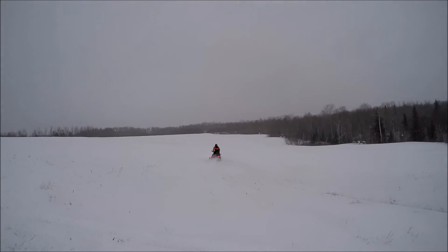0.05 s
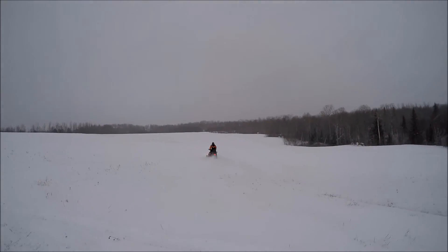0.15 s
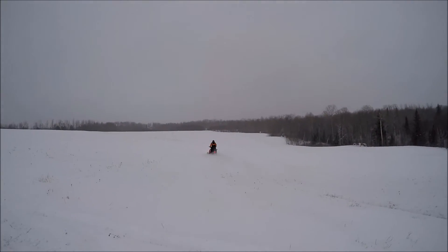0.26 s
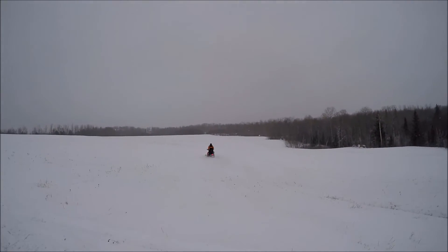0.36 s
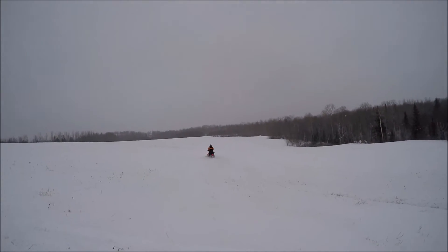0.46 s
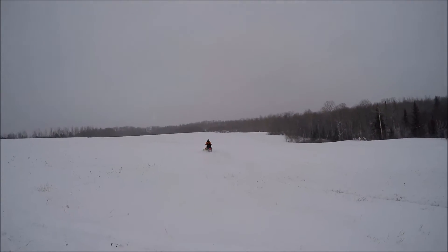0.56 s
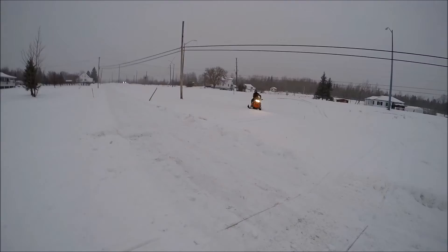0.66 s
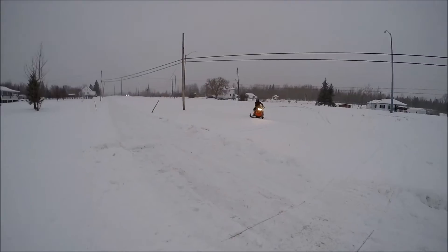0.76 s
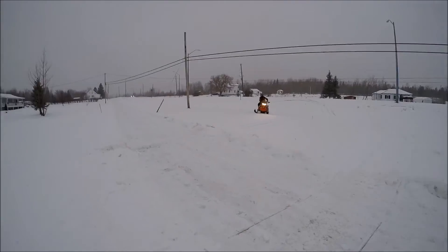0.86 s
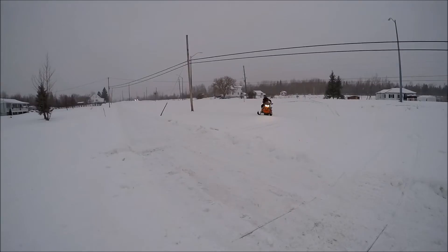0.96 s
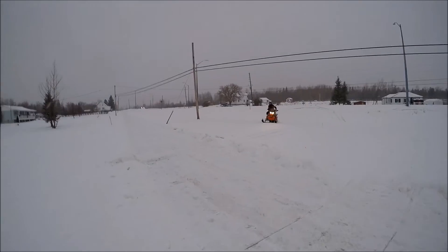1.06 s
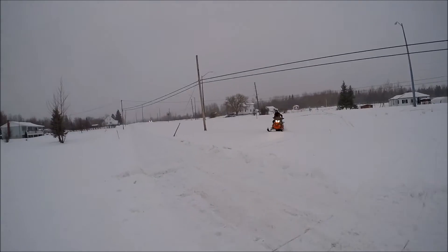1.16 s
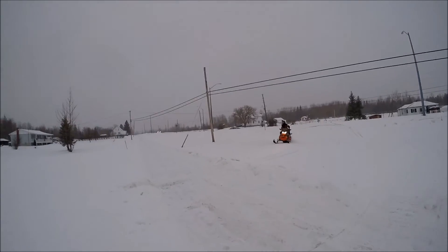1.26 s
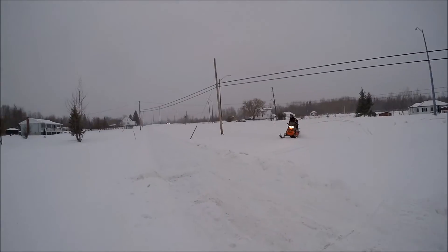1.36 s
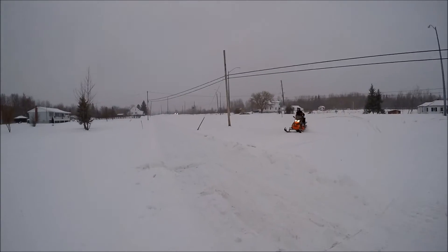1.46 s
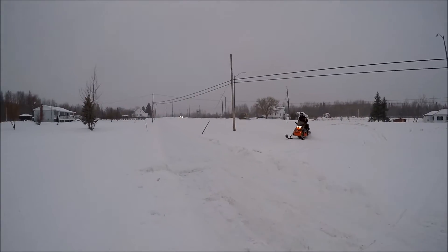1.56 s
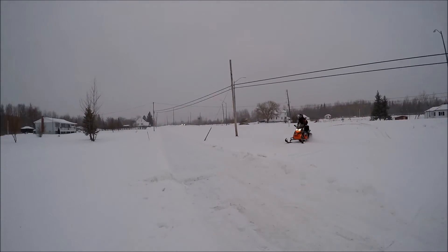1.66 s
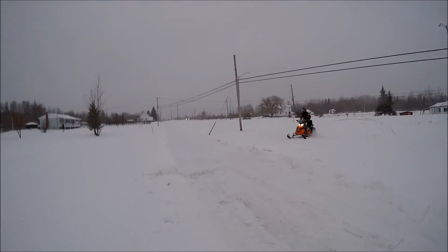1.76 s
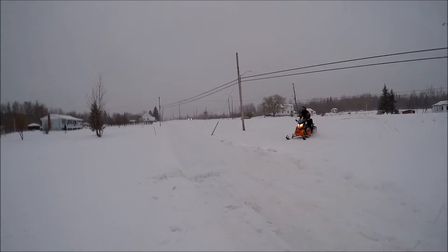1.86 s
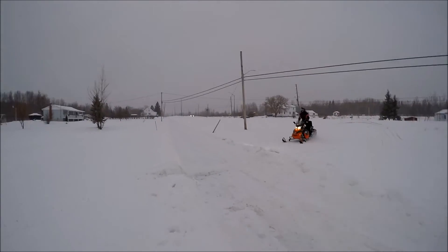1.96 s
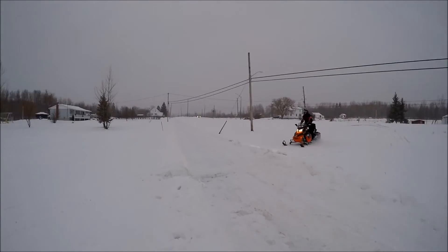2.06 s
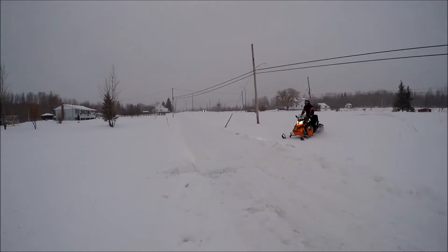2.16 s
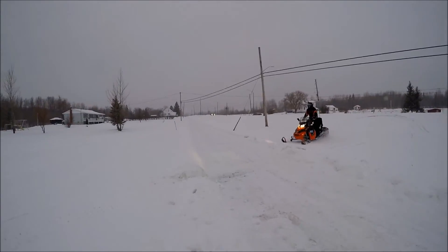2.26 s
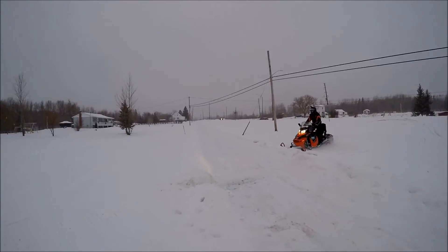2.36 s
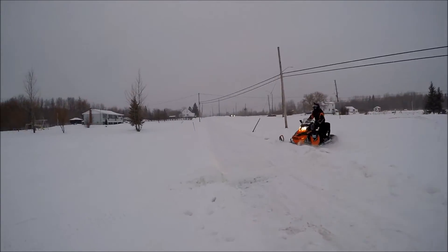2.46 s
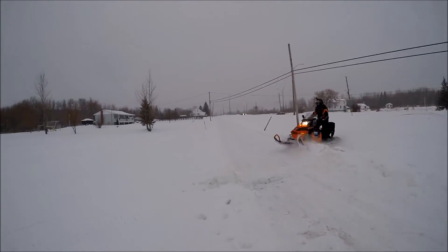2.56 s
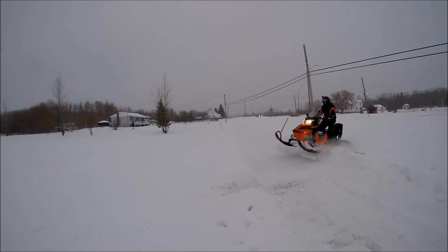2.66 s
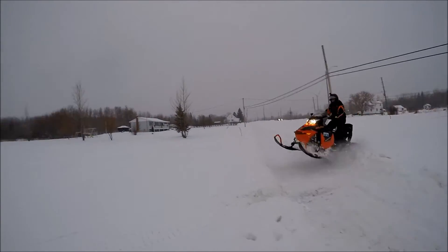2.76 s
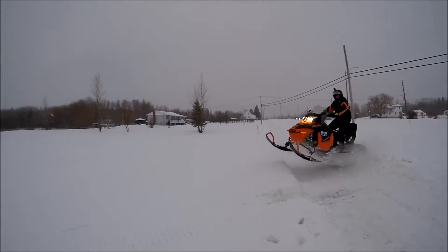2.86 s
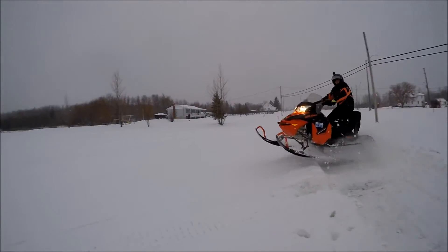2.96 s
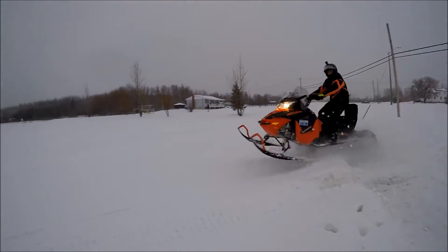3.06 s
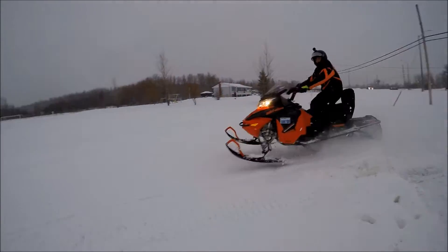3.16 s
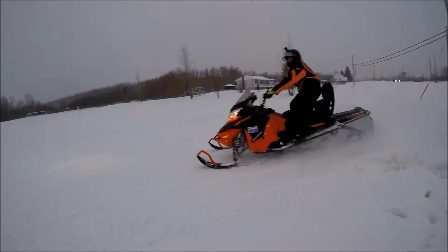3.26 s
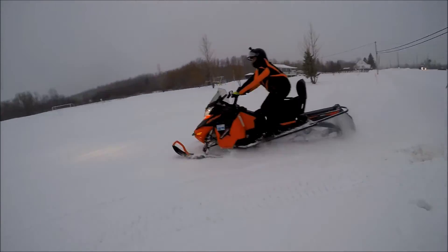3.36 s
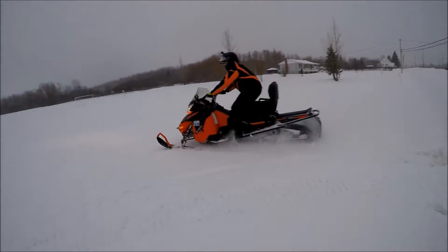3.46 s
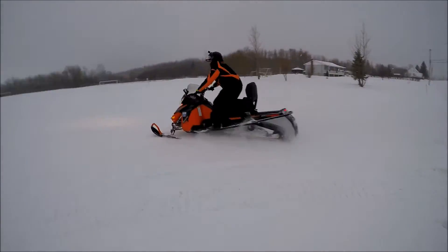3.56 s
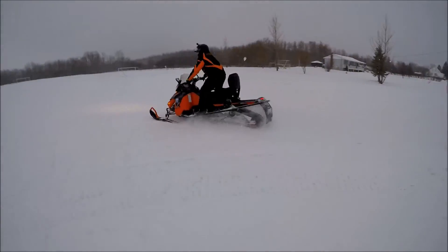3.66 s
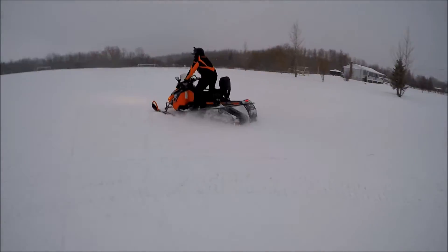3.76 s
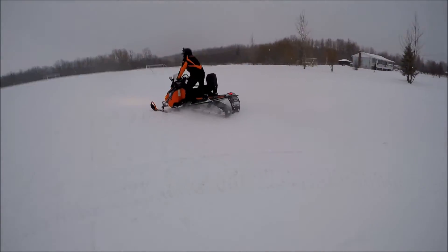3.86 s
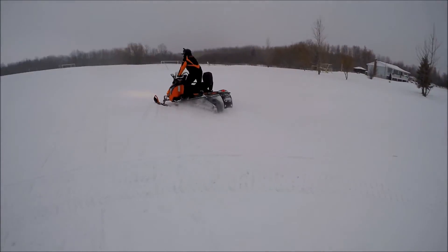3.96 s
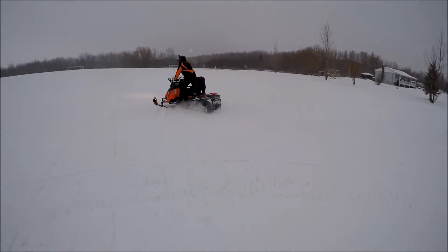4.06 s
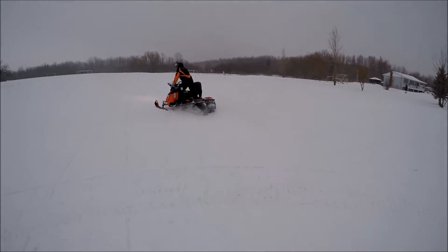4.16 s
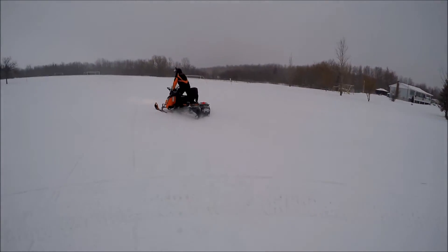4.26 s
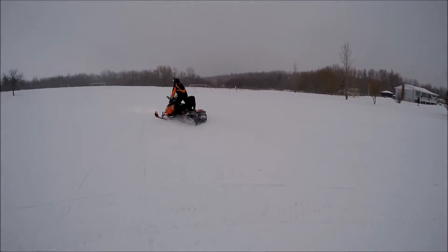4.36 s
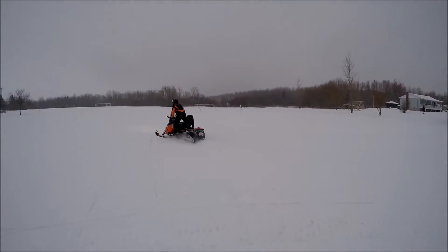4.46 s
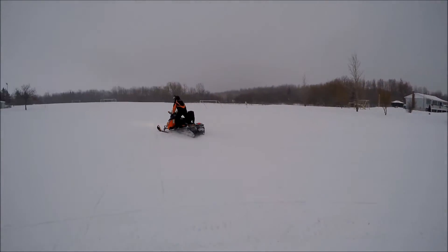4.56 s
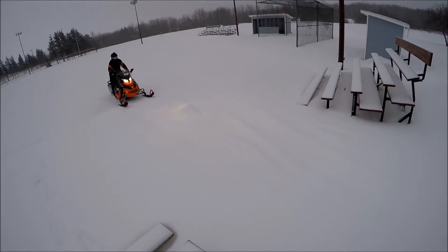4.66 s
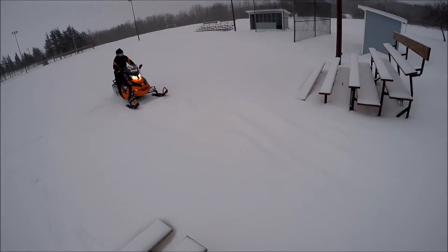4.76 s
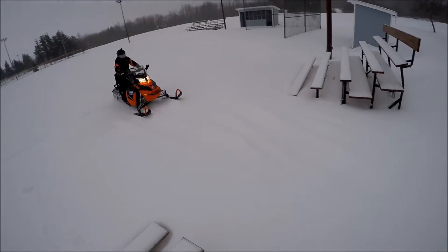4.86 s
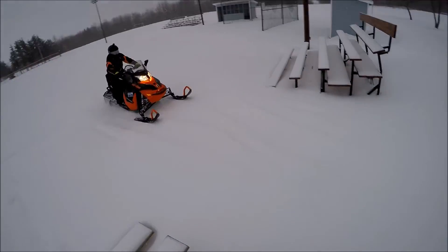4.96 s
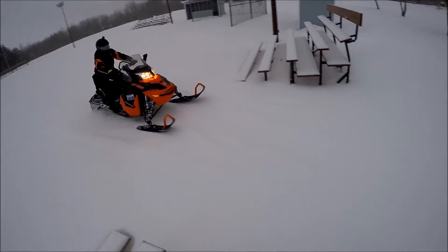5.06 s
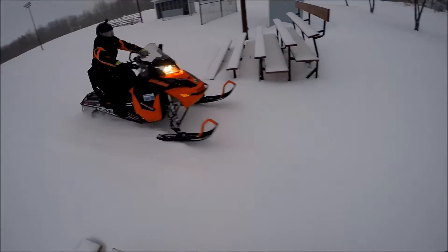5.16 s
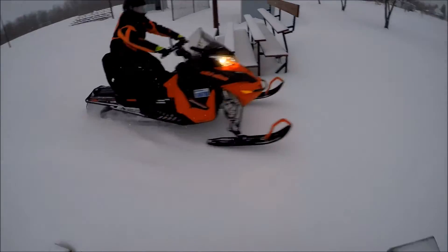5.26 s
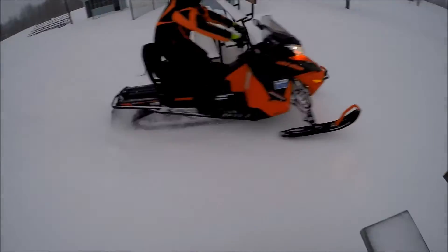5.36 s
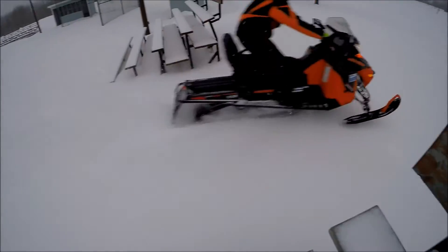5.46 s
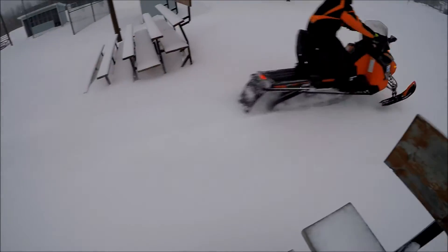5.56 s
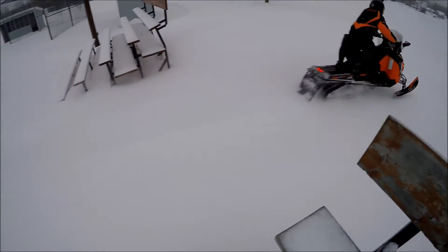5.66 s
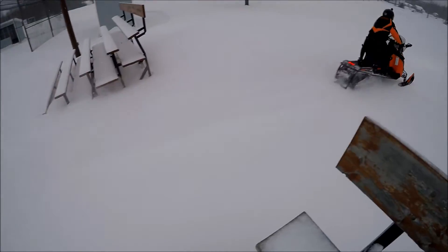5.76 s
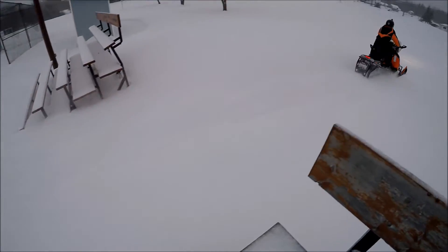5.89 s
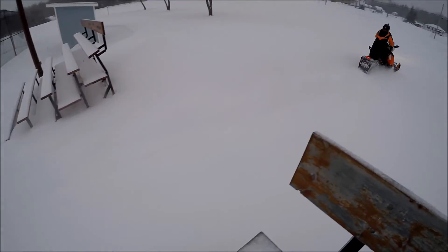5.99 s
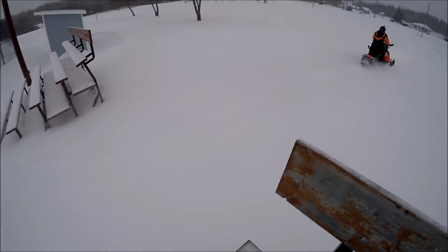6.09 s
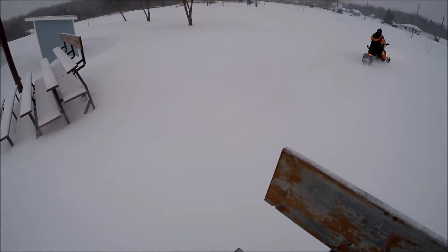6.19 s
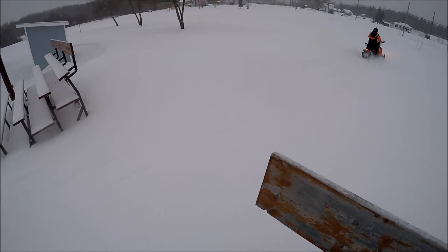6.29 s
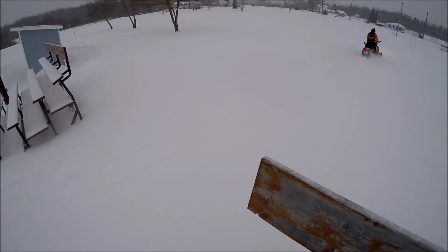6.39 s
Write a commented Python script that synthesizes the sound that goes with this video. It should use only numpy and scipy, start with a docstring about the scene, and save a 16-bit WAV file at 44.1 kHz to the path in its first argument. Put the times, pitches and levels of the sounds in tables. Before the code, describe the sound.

A snowmobile drones faintly across an open snowy field while a glove rubs and clicks on the hand-held microphone. After a brief silence it approaches, revs up over a jump, then eases off with a rattling chassis, humming track and hissing snow. More handling clicks lead to another tiny gap, then the machine buzzes past very close and moves away. Low wind buffets the microphone throughout.

```python
"""A snowmobile drones far off across the snow, then takes a jump, then passes close to the microphone:
three positions, with a brief silence between them. The exhaust drones at the firing rate, the engine
buzzes and clatters, and the track hums at its own lug rate, rattles the chassis and throws snow.
Wind buffets the microphone; a glove rubs and clicks on its housing, mostly just before each silence."""
import sys
import numpy as np
from scipy import signal
from scipy.fft import rfft, irfft
from scipy.io import wavfile
from scipy.ndimage import uniform_filter1d

SR = 44100
rng = np.random.default_rng(int(sys.argv[2]) if len(sys.argv) > 2 else 0)


def persist_wave(psi):
    """Save psi, clipped to +-1, as 16-bit WAV."""
    counts = np.round(np.clip(psi, -1, 1) * 32767).astype(np.int16)
    wavfile.write(sys.argv[1], SR, np.atleast_2d(counts).T)


N = 283563
T = np.arange(N) / SR
BINS = np.fft.rfftfreq(N, 1 / SR)

# microphone positions (far off, at the jump, close by): start t/s, end t/s
POSITIONS = [(0, .656), (.740, 4.592), (4.626, 6.44)]
# spectra at the microphone: f/Hz, level/dB
HISS = [(100, 22), (300, 3), (600, 4.5), (1000, 5.5), (3000, -1.5), (7000, -9), (9700, -6), (12000, -12.5),
        (14500, -10.5), (16000, -32.5)]  # still air and microphone hiss
WIND_BUFFET = [(5, -18), (20, 6), (35, -10.5), (60, -8.5), (100, -34.5), (200, -34.5), (500, -96),
               (1500, -100)]
GLOVE_SCRAPE = [(400, -30), (1100, -10), (1900, 4), (2700, 4.5), (3400, -2), (4200, -7), (5300, -15),
                (6600, -10), (8500, -26), (12000, -24), (16000, -44.5)]
# gusts and lulls: t/s, half length/s, level/dB
GUSTS = [(1.05, .22, -4), (2.2, 0.34, 10), (2.87, 0.19, 6), (3.45, 0.3, 6), (4.75, 0.073, -7),
         (5.7, .25, 2)]
# modes of the microphone's housing: f/Hz, level/dB, t60/s
HOUSING_MODES = [(860, -5, 0.0043), (1720, -0.5, 0.014), (2015, -7.5, 0.02), (2390, -3.5, 0.0096),
                 (3830, -5.5, 0.0053), (5060, -14, 0.012)]
# clicks on the housing: t/s, level/dB, relative knock/dB, relative crack/dB, ring pitch/ratio
CLICKS = [(0.4326, -14, -23, -20, 1.55), (0.4424, -23.5, -4, 9.5, 1.2), (0.5484, -15.5, -20, -35, 0.95),
          (.606, 0.5, -26, -7, 0.99), (0.6206, -20.5, -10.5, 10, 1.1), (0.6257, -14, -12.5, 1, .92),
          (0.6455, 1.5, 14, 0, .9), (0.645, -5.5, 1, -18, 0.73), (0.977, -32.5, -16, -1.5, 1.18),
          (1.063, -48, -20, 13, 3.3), (3.756, -29, -15, 5, 0.58), (4.1088, -11, -22, -16, 1.367),
          (4.357, -20.5, -28, -23, 0.92), (4.5393, -3, 1, -9, 0.93), (6.179, -28.5, -10, -3, 1.15)]
# glove strokes: t/s, length/s, level/dB, squeak f/Hz
RUBS = [(0.428, 0.036, -26, 2300), (0.561, 0.031, -32, 1890), (0.586, 0.083, -37.5, 1970),
        (4.13, 0.021, -35, 1940), (4.173, 0.049, -35.5, 1990), (4.214, 0.069, -41, 2130),
        (4.279, 0.033, -33.5, 2400), (4.368, 0.089, -43.5, 1660), (4.391, 0.034, -41, 1860),
        (4.463, 0.057, -43.5, 2310), (4.581, .012, -43, 2060)]
# soft bumps on the microphone: t/s, level/dB, f/Hz, decay/s
BUMPS = [(0.054, -21, 170, 0.0025), (0.437, -8, 46.7, 0.0095), (0.6, -9.5, 25.2, 0.012),
         (0.645, -2, 99, 0.0024), (0.741, -18.5, 27.1, 0.039), (1.443, -18.5, 38, 0.0081),
         (1.743, -27, 217, 0.0031), (4.112, -11, 54, 0.0087), (4.511, -12.5, 32.6, 0.028)]
# engine and track speed, one list a position: t/s, firing f/Hz, lug f/Hz
SPEED = [
    [(0, 209, 75), (.45, 203, 100)],
    [(.74, 153, 72), (1.5, 151, 75), (1.85, 159, 87), (2.3, 209, 120), (2.55, 249, 159), (2.75, 242, 171),
     (2.92, 238, 208), (3.05, 199, 198), (3.17, 172, 161), (3.35, 143, 127), (3.8, 135, 112),
     (4.59, 123, 89)],
    [(4.63, 200, 151), (4.86, 222, 167), (5.03, 245, 193), (5.2, 255, 236), (5.38, 248, 251),
     (5.63, 235, 224), (5.85, 198, 168), (6.15, 184, 142), (6.43, 176, 131)],
]
# the sled's pass at each position: nearest t/s, time to cover the nearest distance/s, base level/dB,
# gain from behind/dB, relative exhaust/dB, relative track hum/dB
PASSES = [(.4, 2.5, -42.5, -3, -12.5, 1.6), (2.98, 0.7, -34, 2, 9.5, 5), (5.44, 0.25, -28.5, -2, 6, 1.34)]
# pulls on the throttle: open t/s, shut t/s, opening/0-1
THROTTLE_PULLS = [(-.2, 0.688, 0.59), (.7, 1.797, 0.76), (1.825, 2.965, 1), (4.483, 5.6, 0.86)]
# the track bites, spins free or slackens: t/s, half length/s, clatter/dB, spray and ring/dB, rattle/dB
SURGES = [(.39, 0.045, 3, 3, 0), (1.6, 0.36, -1, -7, -2), (1.9, 0.047, 1, -2, 0),
          (2.42, 0.14, 1.5, 3.5, -10), (2.84, .08, -2.5, -2, -5), (3.06, 0.085, 4, 5.5, 13),
          (3.2, 0.057, -3, -4, 11), (3.42, 0.14, 1.5, 1.5, 13), (3.72, 0.3, 0.5, 6, -3),
          (4.98, 0.11, 2, 3, -13), (5.33, 0.088, -0.5, 4, 2), (5.5, 0.095, 1.5, 0.5, 0),
          (5.79, 0.071, 2.5, 1.5, 0), (6.06, 0.068, -1.5, -5, -4)]
# modes of the metal chassis: f/Hz, half width/Hz, level/dB
CHASSIS_MODES = [(2710, 70, 10), (3520, 63, -1.5), (4700, 170, 4.5), (5600, 280, -8.5), (6450, 200, -5.5),
                 (8450, 320, -13), (10500, 290, -17.5)]
# spectra of the chassis: f/Hz, level/dB
CHASSIS_RATTLE = [(200, -15), (400, 8.5), (550, -21), (750, -1), (1000, -10), (1400, 11.5), (2500, -65)]
CHASSIS_RUMBLE = [(30, -31), (70, 4), (130, 6), (200, -2), (300, -7.5), (420, -17.5), (600, -25.5),
                  (1000, -57)]
# spectra of thrown snow, engine clatter and engine buzz, across the field and close by: f/Hz, level/dB
SPRAY_FIELD = [(3500, -21), (5200, 2.5), (5800, 0.5), (6600, 2), (7350, -8.5), (8300, -4.5), (9000, -11.5),
               (9700, -9), (11300, -12.5), (13000, -12), (14800, -20.5), (16000, -44)]
SPRAY_CLOSE = [(3500, -47), (5200, -8), (5700, 6), (6300, 6), (7400, -3.5), (8500, -0.5), (9200, -5.5),
               (10700, -5), (11900, -11), (14000, -12), (15200, -24), (16000, -32)]
CLATTER_FIELD = [(560, -43), (950, -13.5), (1200, -1.5), (1400, 2.5), (1580, -1), (1830, 7), (2010, 0.5),
                 (2290, 6), (2560, -2), (2970, -8.5), (3440, -1.5), (3730, -6), (4160, 0.5), (4680, -5),
                 (5500, -32), (7150, -60), (12100, -120)]
CLATTER_CLOSE = [(560, -14), (950, -17.5), (1080, -11.5), (1300, 2.5), (1420, -2), (1800, 6.5),
                 (2070, -6.5), (2290, -0.5), (2490, -8.5), (2680, -10), (2860, -18.5), (3310, -3.5),
                 (3780, -17), (4130, -4), (5500, -20.5), (7150, -67), (12100, -120)]
BUZZ_FIELD = [(290, -35), (390, -1), (490, -5.5), (570, -28), (750, -12), (950, -20), (1200, 2),
              (1480, 6.5), (1800, 4), (2050, -4.5), (2330, 3.5), (2800, -11.5), (4500, -30)]
BUZZ_CLOSE = [(240, -30), (310, 9), (390, -6), (500, 2.5), (590, -34), (800, -16.5), (1000, -7.5),
              (1300, 6.5), (1800, 2.5), (2050, -3.5), (2260, 6), (2480, -8.5), (2660, -1), (2900, -7.5),
              (4500, -11)]
# harmonics of track and exhaust: multiple of the lug or crank rate, level/dB
LUG_ORDERS = [(1, -1.5), (2, -18.5), (3, -34.5), (4, -39)]
EXHAUST_ORDERS = [(1, -9), (2, 0), (3, -33), (4, -31.5)]
# swells and dips of the track's fundamental and of the exhaust: t/s, half length/s, level/dB
HUM_SWELLS = [(2.65, 0.21, 5), (3.17, 0.13, -10), (3.5, 0.22, 10), (4, 0.23, 0.5), (5.05, 0.39, -5),
              (5.5, 0.028, 6), (5.7, 0.067, -8)]
EXHAUST_SWELLS = [(.9, 0.24, 2.5), (1.85, .12, -3), (2.09, 0.12, -11), (2.45, 0.6, -4.5),
                  (2.73, 0.093, 8.5), (3.05, 0.17, -14.5), (3.45, 0.088, 0.5), (4.8, 0.3, 1.5),
                  (5.74, 0.052, 7.5), (6.35, 0.14, -3)]


def amp(db):
    """Decibels to gain."""
    return 10 ** (np.asarray(db) / 20)


def unit(x):
    """Scales to rms 1."""
    return x / np.sqrt(np.mean(x ** 2) + 1e-20)


def noise():
    """White noise."""
    return rng.standard_normal(N)


def wander(hz):
    """Random drift of rms 1, up to about hz."""
    return unit(irfft(rfft(noise()) / (1 + (BINS / hz) ** 4), N))


def colour(x, spectrum):
    """Shapes x with a spectrum, at rms 1."""
    hz, db = np.transpose(spectrum)
    return unit(irfft(rfft(x) * amp(np.interp(np.log(BINS + 1), np.log(hz), db)), N))


def by_place(x, field, close):
    """Colours x for the open field, or for the close pass at the last position."""
    return np.where(T < POSITIONS[2][0], colour(x, field), colour(x, close))


def swells(rows):
    """Smooth rises and dips in dB, one curve for each level column."""
    return np.squeeze(sum(np.outer(dbs, np.exp(-((T - s) / half) ** 2)) for s, half, *dbs in rows))


def harmonics(turns, orders):
    """Sines on multiples of a rotation, at random phases."""
    return sum(amp(db) * np.sqrt(2) * np.sin(2 * np.pi * (k * turns + rng.random())) for k, db in orders)


def add(mix, s, sound):
    """Mixes a sound in at time s."""
    part = mix[max(round(s * SR), 0):][:len(sound)]
    part += sound[:len(part)]


def hiss():
    """Still air and the microphone's own faint noise."""
    return amp(-59) * colour(noise(), HISS)


def wind():
    """Lumpy low buffeting at the microphone."""
    return colour(noise(), WIND_BUFFET) * amp(-30 + swells(GUSTS) + 1.73 * wander(2.4))


def bumps():
    """Soft bumps push on the microphone, each a low damped pulse."""
    out, t = np.zeros(N), T[:SR // 4]
    for s, db, hz, decay in BUMPS:
        envelope = t / decay * np.exp(1 - t / decay)
        add(out, s, -amp(db) * envelope * np.sin(2 * np.pi * hz * t))
    return out


def housing_clicks():
    """Taps right at the microphone ring its housing, with a crack and a hollow knock."""
    out, t = np.zeros(N), T[:SR // 4]
    lowpass = signal.butter(2, 7400, fs=SR)
    for s, db, knock_db, crack_db, pitch in CLICKS:
        ring = np.zeros(len(t))
        for k, (hz, mode_db, t60) in enumerate(HOUSING_MODES):
            mode_hz = hz * pitch * rng.uniform(0.86, 1.04)
            ring += (-1) ** k * amp(mode_db - 60 * t / t60) * np.sin(2 * np.pi * mode_hz * t)
        burst = rng.standard_normal(len(t)) * np.exp(-t / 0.0011)
        crack = amp(crack_db) * signal.lfilter(*lowpass, burst)
        knock = amp(knock_db) * np.sin(2 * np.pi * 430 * t) * np.exp(-t / 0.00051)
        add(out, s, amp(db) * (0.84 * ring + crack + knock))
    return out


def glove_rubs():
    """A glove slips over the housing: a narrow squeak and a broad scrape."""
    squeaks, friction = np.zeros(N), np.zeros(N)
    for s, length, db, hz in RUBS:
        n = round(length * SR)
        slips = unit(rng.standard_normal(n) * amp(0.91 * rng.standard_normal(n)))
        stroke = amp(db) * signal.windows.tukey(n, .4)
        squeak = signal.lfilter(*signal.butter(2, [hz * .88, hz * 1.12], "band", fs=SR), slips)
        add(squeaks, s, stroke * unit(squeak))
        add(friction, s, stroke * slips)
    return amp(3) * squeaks + amp(3.5) * np.std(friction) * colour(friction, GLOVE_SCRAPE)


def speeds():
    """Firing and lug rates in Hz; each position takes over at its own start."""
    curves = np.zeros((2, N))
    for (start, _), rows in zip(POSITIONS, SPEED):
        times, *rates = np.transpose(rows)
        curves[:, T >= start] = [np.interp(T[T >= start], times, hz) for hz in rates]
    return curves


def thumb_throttle(travel_s=0.057):
    """Throttle opening, 0-1: the thumb takes a moment to open or shut it."""
    pulls = sum(opening * ((T >= opens) & (T < shuts)) for opens, shuts, opening in THROTTLE_PULLS)
    return uniform_filter1d(pulls, size=int(travel_s * SR))


def pass_by(lug_hz, throttle, db_per_octave=6.5, load_db=4):
    """Sled, exhaust and hum levels at the microphone: louder when near, fast and under load."""
    position = sum((T >= start).astype(int) for start, _ in POSITIONS[1:])
    nearest_s, cover_s, base_db, rear_db, exhaust_db, hum_db = np.array(PASSES)[position].T
    along = (T - nearest_s) / cover_s
    distance = np.hypot(1, along)  # in multiples of the nearest distance
    behind = along / distance  # -1 approaching, 1 going away
    db = base_db - 20 * np.log10(distance) + rear_db * behind
    db += db_per_octave * np.log2(lug_hz / 200) + load_db * throttle
    return db, db + exhaust_db, db + hum_db, behind


def snow_spray(lugs, db, behind, jolts):
    """The lugs fling snow backwards: a fluttering hiss, a little louder from behind."""
    puffs = noise() * (1 + 0.051 * np.cos(2 * np.pi * lugs)) * amp(2.04 * wander(300))
    return by_place(puffs, SPRAY_FIELD, SPRAY_CLOSE) * amp(db - 18.5 + behind + 1.9 * jolts)


def chassis(rattle_db, ring_db, coast, jolts):
    """The chassis rattles over uneven snow; grit and lugs keep its metal ringing."""
    rattle = colour(noise(), CHASSIS_RATTLE) * amp(rattle_db - 24.5 + 1.2 * jolts)
    modes = sum(amp(db) / (1 + ((BINS - hz) / width) ** 2) for hz, width, db in CHASSIS_MODES)
    ring = unit(irfft(rfft(noise()) * modes, N))
    return rattle + ring * amp(ring_db - 19.5 - 0.5 * coast + 2.5 * jolts)


def track_rumble(db, buzz_db, jolts):
    """Off the throttle, as the buzz fades, the slack track flaps against the chassis."""
    return colour(noise(), CHASSIS_RUMBLE) * amp(db - 1.5 - 0.95 * buzz_db + 0.73 * jolts)


def track_hum(lugs, db, behind, coast):
    """The track hums at its lug rate; slack when coasting, it is louder, brighter and flutters more."""
    fundamental = harmonics(lugs, LUG_ORDERS[:1]) * amp(swells(HUM_SWELLS))
    # the body shields the overtones towards the front
    overtones = harmonics(lugs, LUG_ORDERS[1:]) * amp(2.5 * behind + 2 * coast)
    flutter_db = (2.5 + 2.5 * coast) * wander(23)
    return (fundamental + overtones) * amp(db + 4.5 * coast + flutter_db)


def engine_buzz(crank, jitter_turns=0.0016):
    """Knocks repeat with the crank; each order fades and swells on its own."""
    turns = crank + jitter_turns * wander(120)  # uneven knocks blur the high orders into rasp
    knots = np.linspace(0, T[-1], num=44)
    out = np.zeros(N)
    for k in range(3, 46):
        order_db = np.minimum(6 * rng.standard_normal(len(knots)), 6) - 3 * (k % 2)
        out += amp(np.interp(T, knots, order_db)) * np.cos(2 * np.pi * (k * turns + rng.random()))
    return by_place(unit(out), BUZZ_FIELD, BUZZ_CLOSE)


def engine(crank, db, buzz_db, jolts):
    """Noisy clatter that locks to the crank under load and turns into a buzz."""
    rasp = noise() * (1 + 0.098 * np.cos(4 * np.pi * crank) + 0.19 * np.cos(2 * np.pi * crank))
    clatter = by_place(rasp, CLATTER_FIELD, CLATTER_CLOSE)
    locked = amp(buzz_db + 1)
    return (clatter + locked * engine_buzz(crank)) * amp(db + jolts) / np.hypot(1, locked)


def exhaust(crank, db, rev_hz_per_s, burble_db=8):
    """Drone at the firing rate; as the revs fall the engine fires unevenly and overtones come out."""
    overrun = np.clip(-uniform_filter1d(rev_hz_per_s, size=SR // 5) / 45, 0, 1)
    drone = harmonics(crank, EXHAUST_ORDERS[:2])
    burble = harmonics(crank, EXHAUST_ORDERS[2:]) * amp(burble_db * overrun)
    flutter_db = (1.5 + 2.7 * overrun) * wander(33)
    return (drone + burble) * amp(db + swells(EXHAUST_SWELLS) + flutter_db - 2 * overrun)


def snowmobile():
    """The whole sled as the microphone hears it, driven by speed, throttle and distance."""
    firing_hz, lug_hz = speeds()
    throttle = thumb_throttle()
    coast = 1 - throttle
    rev_hz_per_s = np.gradient(firing_hz, T)
    climb = uniform_filter1d(np.clip(rev_hz_per_s / 53, -1, 1), size=SR // 5)
    buzz_db = -6 + 7.5 * throttle + 3 * climb  # most buzz while the revs climb
    sled_db, exhaust_db, hum_db, behind = pass_by(lug_hz, throttle)
    clatter_db, grit_db, rattle_db = sled_db + swells(SURGES)
    crank = np.cumsum(firing_hz / 2 * (1 + 0.00373 * wander(39))) / SR  # two firings a turn
    lugs = np.cumsum(lug_hz * (1 + 0.013 * wander(26.8))) / SR
    out = exhaust(crank, exhaust_db, rev_hz_per_s) + track_hum(lugs, hum_db, behind, coast)
    jolts = wander(22)  # the sled shakes on uneven snow
    out += engine(crank, clatter_db, buzz_db, jolts)
    out += chassis(rattle_db, grit_db, coast, jolts)
    out += track_rumble(sled_db, buzz_db, jolts)
    return out + snow_spray(lugs, grit_db, behind, jolts)


def scene():
    """One hand-held microphone on open snow: the sled, wind and handling over a faint hiss."""
    return (snowmobile() + wind() + housing_clicks() + glove_rubs() + bumps() + hiss())[None]


def record(dry, edge_hz=15800):
    """Silence between positions, overload on the hardest clicks, then the band limit."""
    live = sum((T >= start) & (T < end) for start, end in POSITIONS).astype(float)
    clipped = np.clip(dry * uniform_filter1d(live, size=40), -1, 1)
    lowpass = signal.firwin(255, edge_hz, window=("kaiser", 9), fs=SR)
    return signal.oaconvolve(clipped, lowpass[None], "same")


dry = scene()
out = record(dry)
persist_wave(out)
```